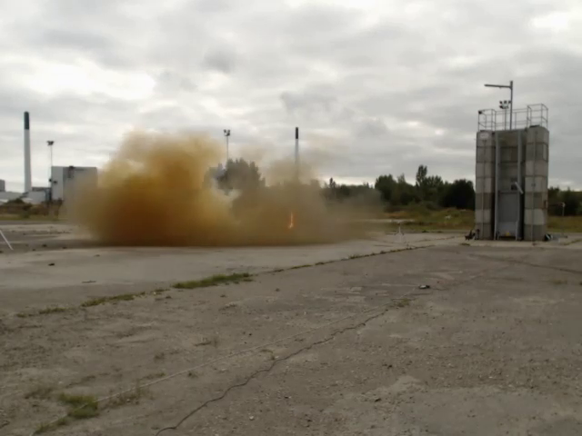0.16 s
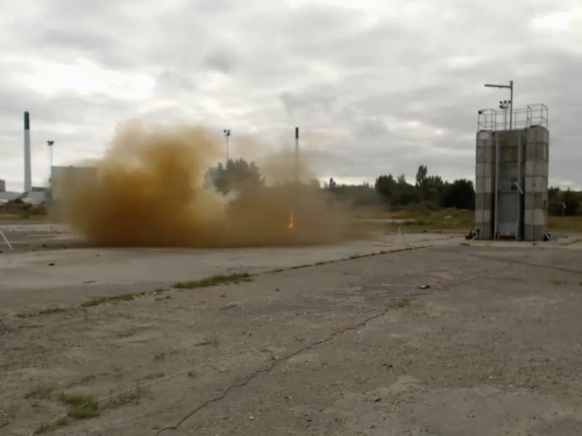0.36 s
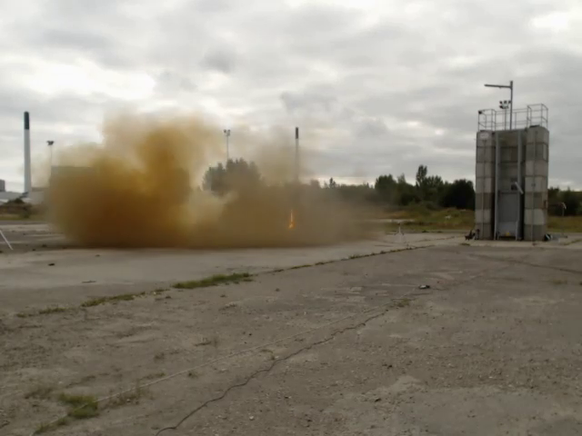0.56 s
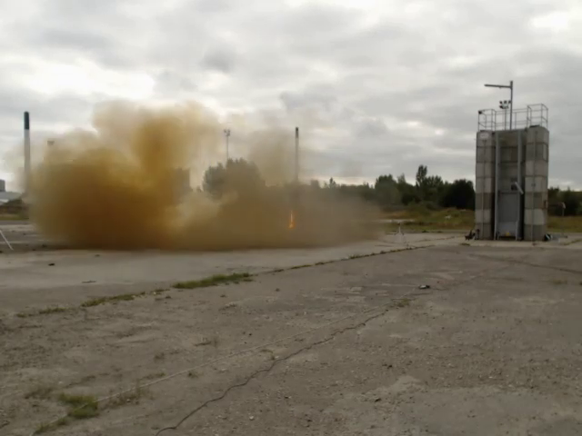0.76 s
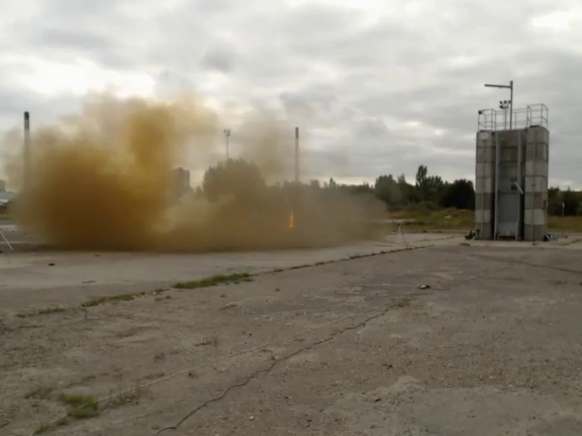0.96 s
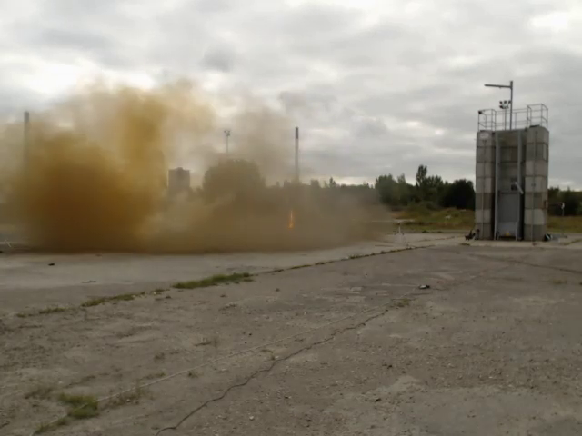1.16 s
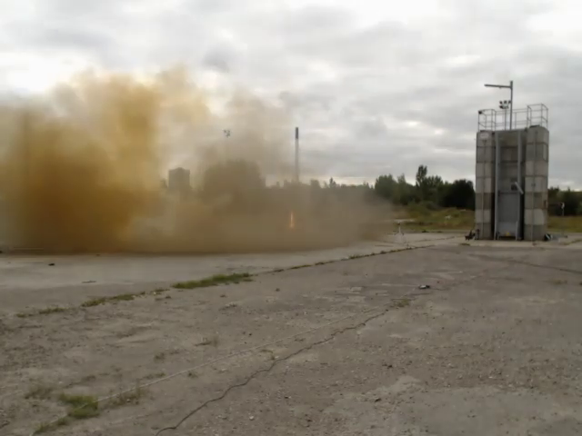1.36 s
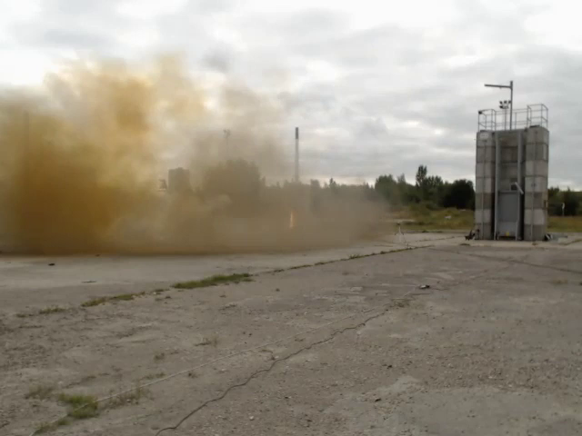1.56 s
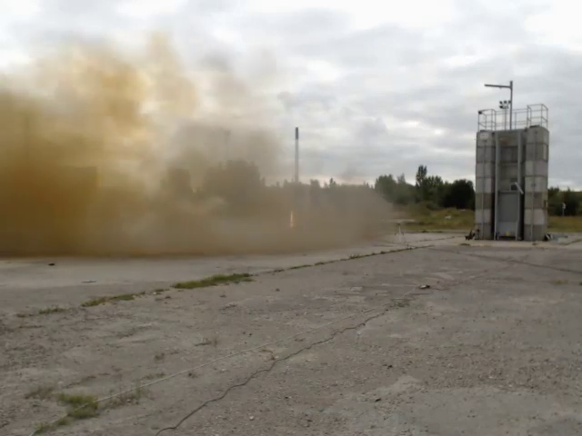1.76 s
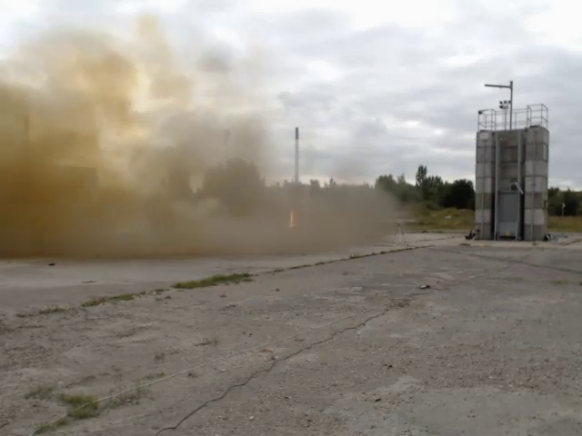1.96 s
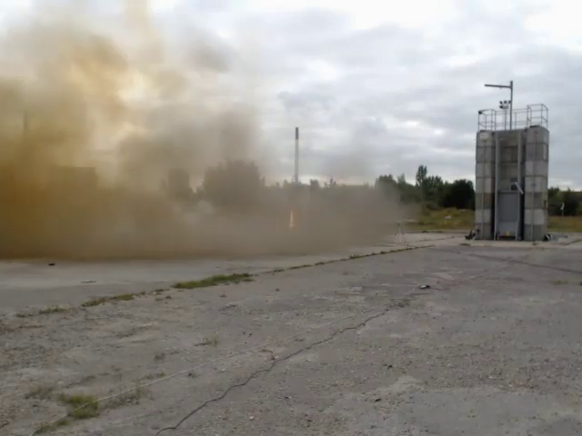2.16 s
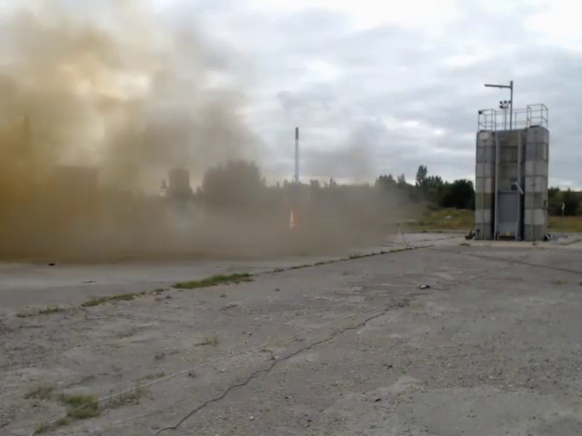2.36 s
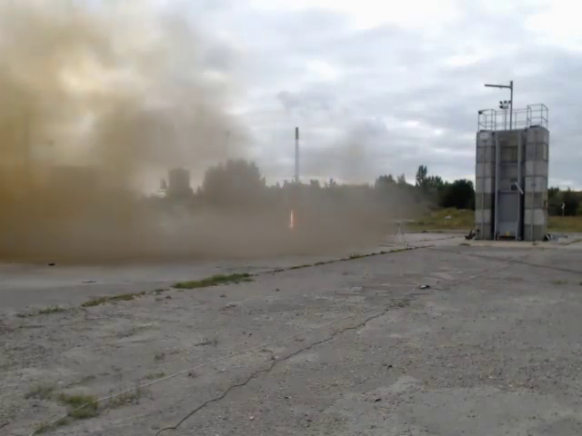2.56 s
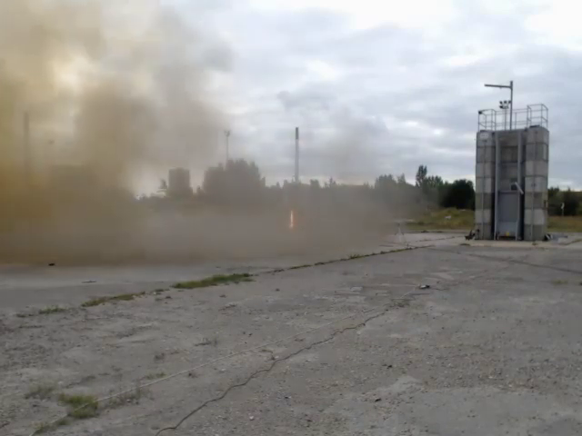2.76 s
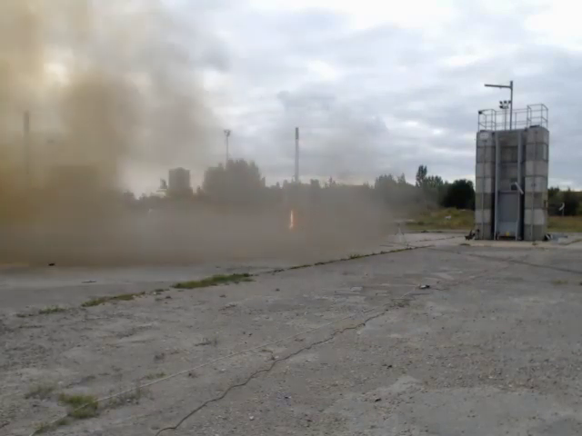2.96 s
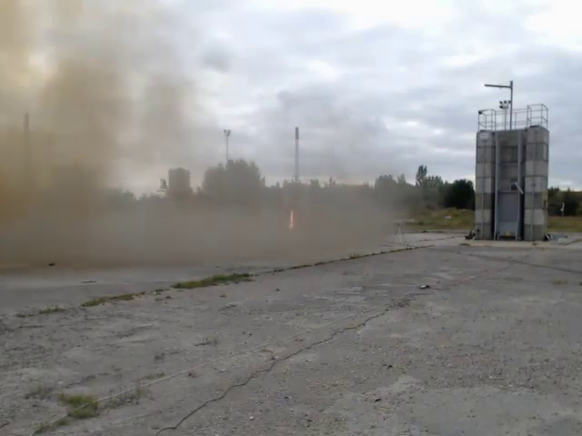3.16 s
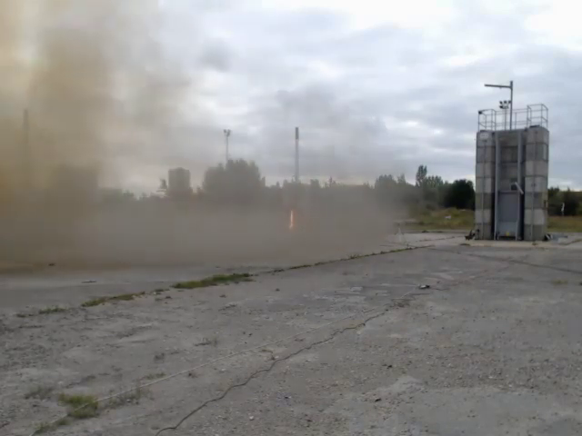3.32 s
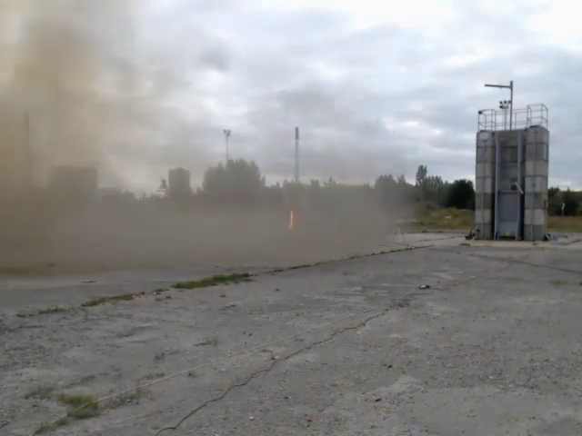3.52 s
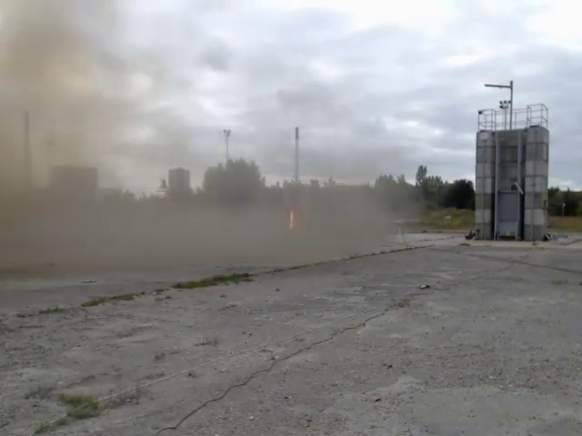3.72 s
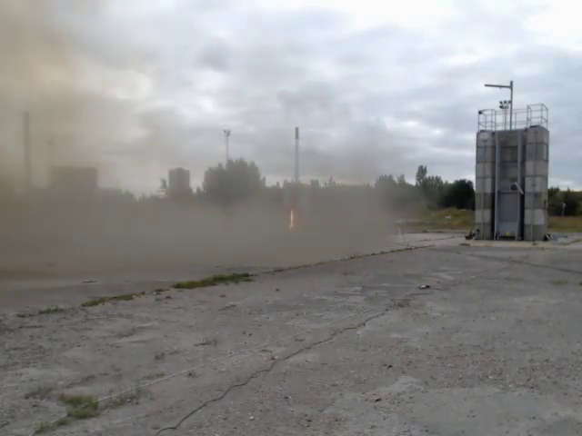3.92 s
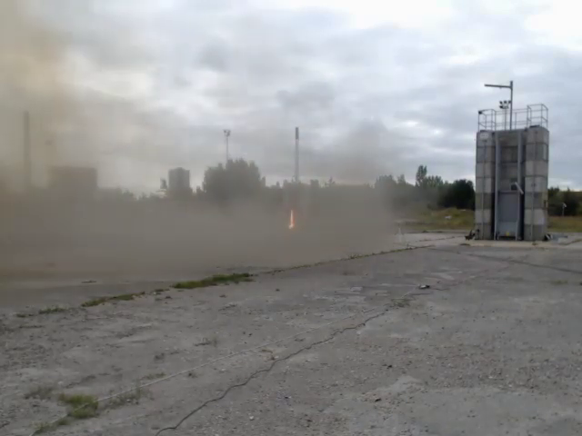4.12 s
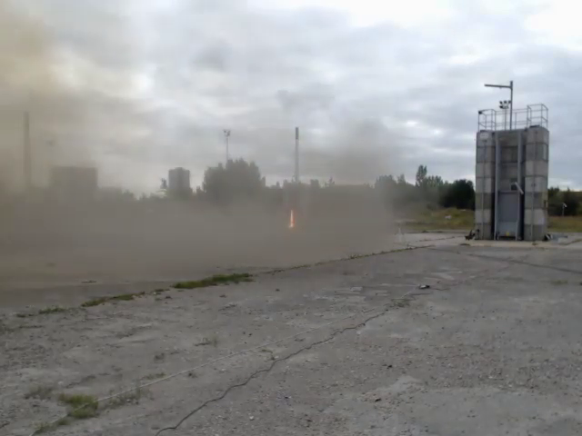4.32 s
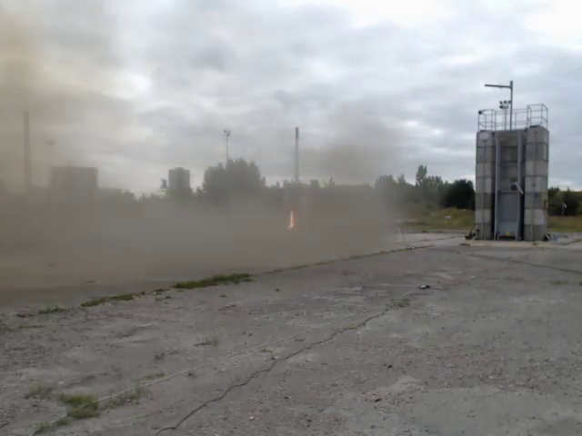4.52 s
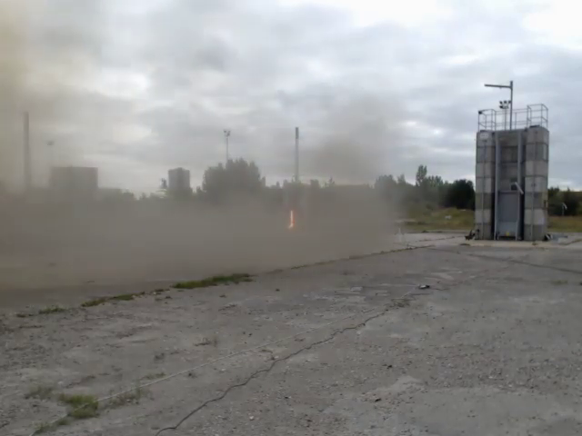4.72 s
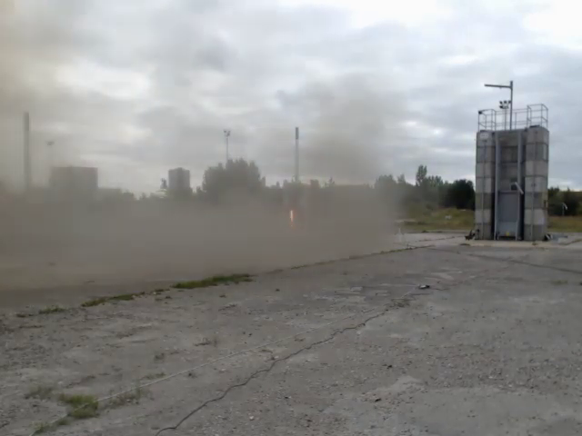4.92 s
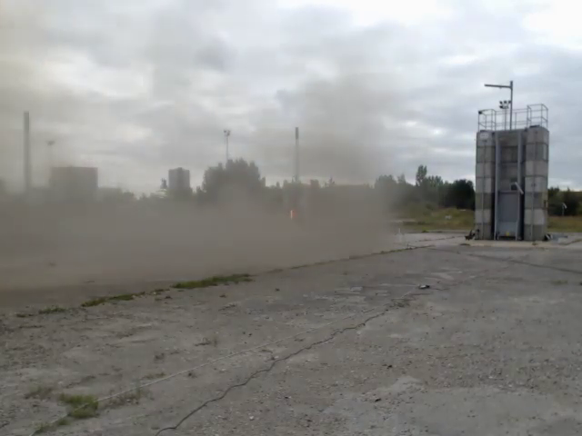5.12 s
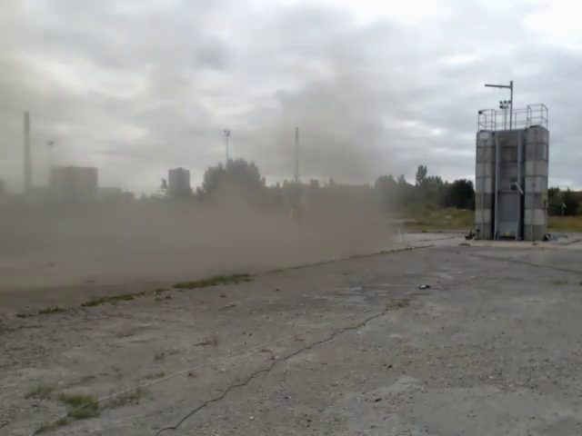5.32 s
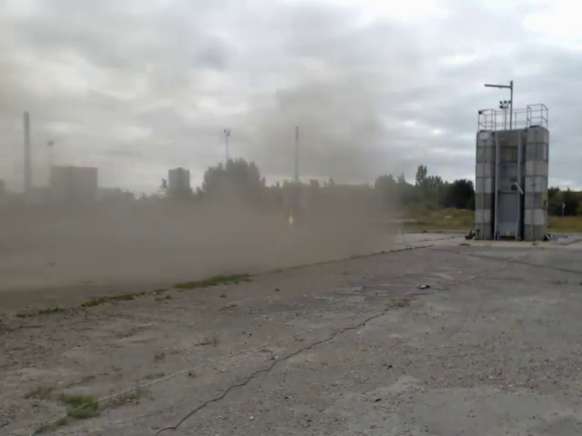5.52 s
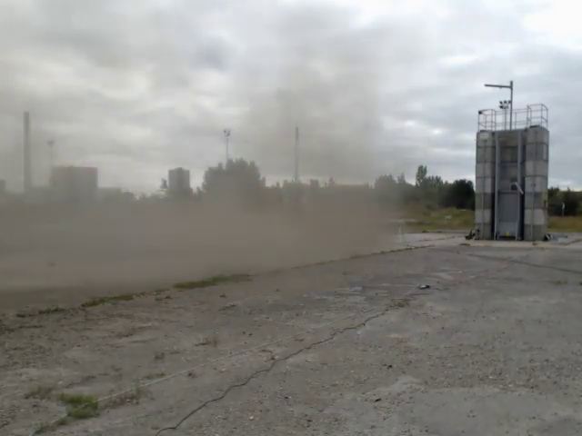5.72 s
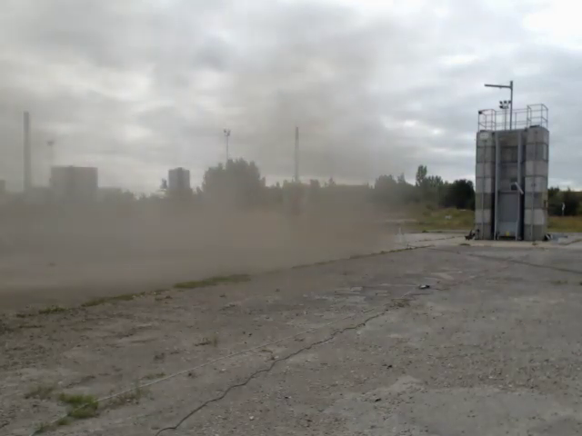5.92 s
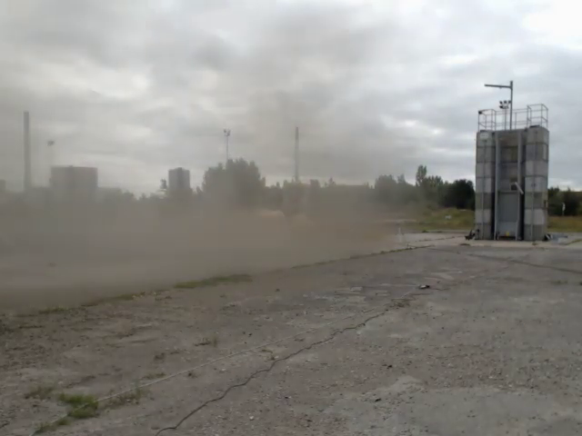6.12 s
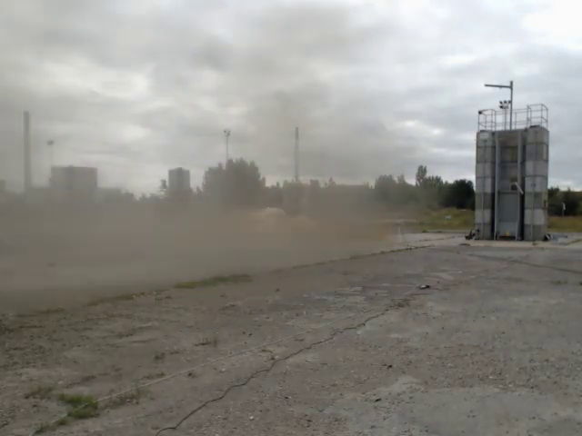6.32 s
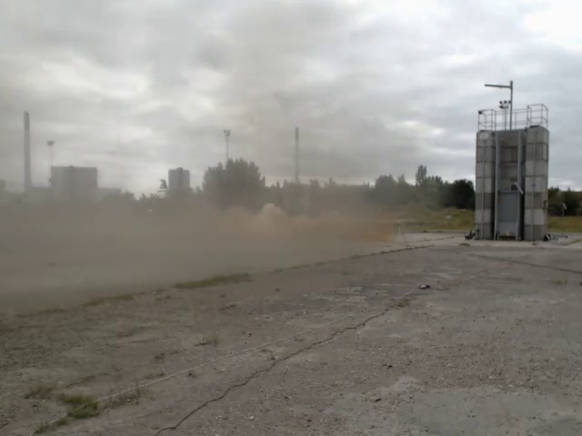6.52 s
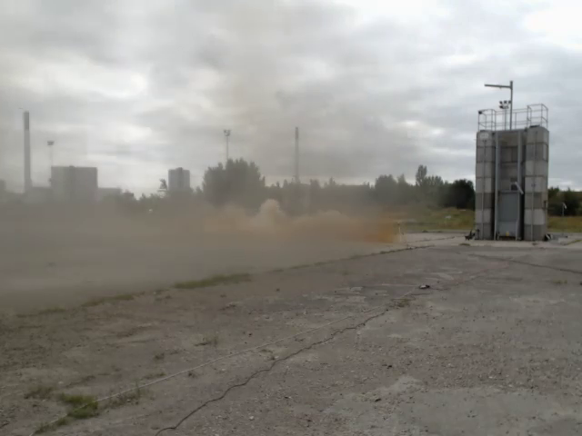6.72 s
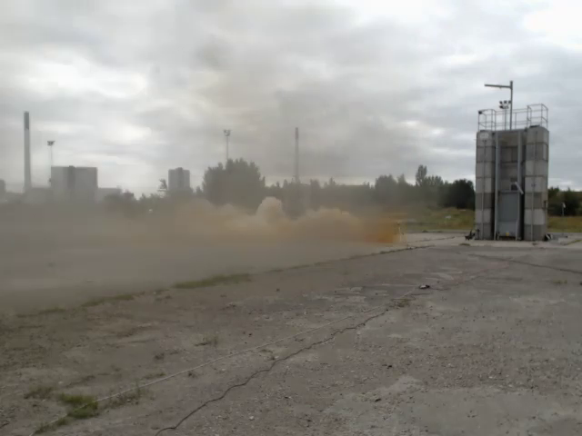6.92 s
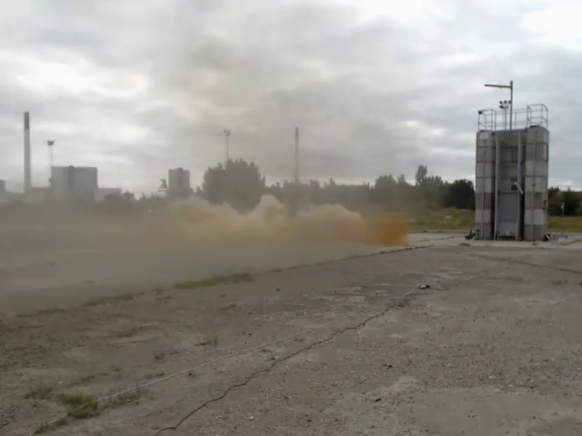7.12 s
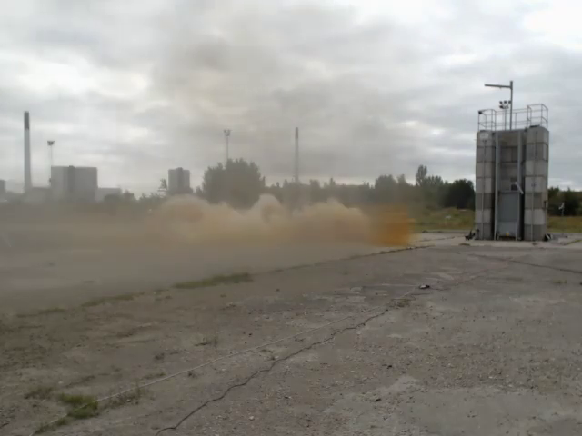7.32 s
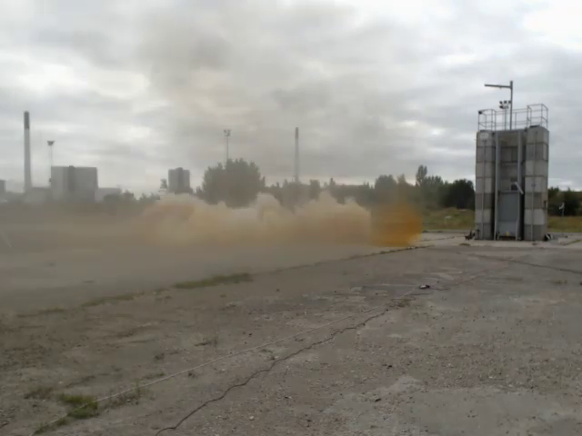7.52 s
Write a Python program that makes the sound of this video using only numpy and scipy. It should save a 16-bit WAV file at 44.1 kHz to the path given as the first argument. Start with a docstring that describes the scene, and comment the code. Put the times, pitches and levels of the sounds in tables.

```python
"""A rocket engine burns on an outdoor test stand: its turbulent jet roars over a surging rumble.
Bands of noise that swell and sink separately make the roar; slow bell-shaped lifts make the rumble surge.
Eddies in the plume howl as narrow, gliding, gusty bands of noise. The sound overloads a mono microphone,
whose gain is faded down slowly; towards the end the thrust sags and the sound turns duller."""
import sys
import numpy as np
from scipy import signal
from scipy.fft import rfft, irfft, next_fast_len
from scipy.io import wavfile
from scipy.ndimage import uniform_filter1d

SR = 44100
rng = np.random.default_rng(int(sys.argv[2]) if len(sys.argv) > 2 else 0)


def digitize_waveform(pressure):
    """Quantize a signal to 16-bit integers and store it at the path in sys.argv[1].

    Rows of a 2-D input are taken as channels; values are limited to [-1, 1].
    """
    field = np.atleast_2d(pressure).T
    bounded = np.clip(field, -1, 1)
    quanta = np.round(bounded * 32767).astype(np.int16)
    wavfile.write(sys.argv[1], SR, quanta)


N = 338247
TIME = np.arange(N) / SR  # seconds
TICKS = np.linspace(0, N / SR, 3000)  # slow control grid, seconds

# Basic spectrum of the jet noise, relative: frequency_hz, density_db (per Hz)
JET_SPECTRUM = [(40, 4), (100, -7.5), (160, -3.5), (290, -4), (550, -8.5), (950, -6.5), (1550, -7),
                (2200, -3.5), (3000, 1), (3800, 0.5), (5000, -3), (7500, -9), (10000, -17), (15000, -33)]
# Bands that reflections from the ground and the stand lift or hollow:
# centre_hz, width_hz (full width at half the lift), lift_db
REFLECTION_BANDS = [(207, 77, 3), (390, 180, 3.5), (530, 130, -1), (710, 97, 1), (960, 240, 2.5),
                    (1368, 80, 5), (1783, 270, 3), (2060, 160, 0.5), (2715, 160, 2), (3160, 160, 1),
                    (3740, 120, 3.5)]
# Centres of rumble, body and roar, then the lower edge of the shriek: frequency_hz
ZONE_HZ = [190, 470, 950, 2200]
# Slow drift of the lower zones against the shriek: time_s, rumble_db, body_db, roar_db
ZONE_DRIFT = [(0, -5, 6, 1), (.35, -8.5, 5, 5), (.95, -2.5, -6, 0), (1.5, -8, -2.5, -2.5),
              (1.95, 0.5, -6.5, 1.5), (2.45, 2, 3, 3), (3.2, 1, -1.5, 3), (3.65, -3, 5.5, -0.5),
              (4.0, -1.5, 3, 3.5), (4.75, -1, -3, 2.5), (5.15, 0.5, 2, 0), (6.1, -3, -1, 1),
              (6.65, 0.5, 3, 6.5), (7.67, 4, 11, 7)]
# Thrust of the engine: time_s, pressure_db (drive ahead of the microphone), hiss_db (lift of the top bands)
THRUST_COURSE = [(0, 32, 2), (.7, 7, 4.5), (1.3, -0.5, 0), (1.9, -8, -1.5), (2.4, -7.5, 1), (2.8, -5.5, 2),
                 (4.5, -1, 1), (5.5, -1.5, 1.5), (6.1, -1, -1), (6.5, -6.5, 4.5), (7.25, -15, 1),
                 (7.67, -15, -2)]
# Strength of the swirling at the eddy size that swirls most: time_s, spread_db
SWIRL_COURSE = [(0, 1), (1.2, 2.4), (1.7, 4), (2.5, 4), (3.3, 2), (5, 0.5), (7.67, 2.5)]
# Surges of the rumble as the plume billows: middle_s, lift_db
BILLOWS = [(.82, 5), (1.45, 8), (1.75, 6), (2.8, 5.5), (3.17, 5), (4.35, 5), (4.88, 3.5), (5.78, 9),
           (6.6, 7), (6.95, 5.5)]
BILLOW_S = 0.098  # from the peak of a surge to 1/e of its lift, either side
# Loudest howling eddies: middle_s, length_s, start_hz and end_hz (half a length before and after the middle),
# width_hz, level_db (relative to the jet, ahead of HOWL_TRIM_DB)
LOUD_EDDIES = [ (.42, 0.46, 960, 1001, 480, -6.5), (0.462, .16, 4730, 4580, 900, -4),
               (0.641, 0.14, 3753, 3003, 700, -5), (0.668, .15, 1000, 1000, 170, -9.5),
               (.888, .17, 1780, 1830, 420, -4.5), (1.098, .16, 3690, 3650, 900, -1.5),
               (1.307, .12, 2980, 2850, 700, -4.5), (1.405, 0.051, 6410, 6400, 800, -5.5),
               (1.508, .07, 1262, 1390, 350, -8), (1.565, 0.069, 3175, 2800, 500, -1),
               (1.68, 0.095, 4316, 3850, 900, -1), (1.801, 0.17, 1354, 1394, 280, -6.5),
               (1.80, .11, 2236, 2107, 500, -7.5), (1.863, 0.054, 4100, 3520, 500, -3),
               (1.96, .11, 2788, 2396, 350, -2.5), (2.001, .12, 1457, 1753, 320, -5.5),
               (2.044, .09, 3600, 3750, 800, -1.5), (2.12, .11, 1875, 1917, 450, -9),
               (2.229, .09, 3930, 4130, 550, -3.5), (2.327, 0.088, 1201, 906, 180, -2.5),
               (2.461, .063, 1964, 1820, 300, -4), (2.468, 0.092, 2620, 2770, 400, 0.5),
               (2.498, .12, 320, 358, 110, -10), (2.549, .10, 1500, 1428, 380, -1.5),
               (2.649, .13, 3030, 2693, 600, -1.5), (3.121, 0.058, 1410, 1290, 220, -9),
               (3.413, .11, 2870, 3350, 650, 1), (3.699, .25, 3150, 2990, 600, -4),
               (3.863, 0.051, 2940, 3140, 380, -3.5), (5.25, 0.47, 3650, 3606, 1000, -5.5),
               (5.909, .26, 832, 1157, 340, -9.5), (6.203, 0.23, 2240, 2000, 550, -8.5),
               (6.356, 0.12, 5760, 6150, 1300, -7.5), (6.545, 0.17, 7300, 6870, 1700, -8),
               (6.95, .45, 330, 370, 110, -13), (7.051, 0.61, 2094, 2120, 260, -10.5),
               (7.202, .22, 1013, 1014, 170, -8.5), (7.51, .13, 2650, 3150, 450, -2.5)]
# Fainter random eddies: pitch range, mean length, largest glide either way, level ahead of HOWL_TRIM_DB
EDDY_LOW_HZ, EDDY_HIGH_HZ, EDDY_S, EDDY_GLIDE_OCTAVES, EDDY_DB = 1300, 5190, .09, 0.1164, -10.5
EDDY_WIDTH_SHARE = 0.19  # bandwidth as a share of the starting pitch
HOWL_TRIM_DB = -1.15  # common to all eddies
# The recorder's volume as it is turned down: time_s, gain_db
VOLUME_FADE = [(0, -7.4), (1.2, -8.5), (2.05, -11), (2.85, -15.5), (3.5, -17), (4.6, -21.7), (5.6, -23.5),
               (6.6, -25), (7.2, -27), (7.67, -32)]
TOP_HZ = 15700  # upper edge of the pass band


def undb(db):
    """Amplitude ratio is ten to the power of the level in decibels over twenty."""
    return 10 ** (np.asarray(db) / 20)


def unit(x):
    """Division by the root mean square gives unit effective amplitude."""
    return x / np.sqrt(np.mean(x ** 2))


def curves(table):
    """Linear interpolation carries each column of a timed table onto the control grid."""
    times, *columns = np.transpose(table)
    return [np.interp(TICKS, times, column) for column in columns]


def smooth(control):
    """Linear interpolation fills a slow control in for every sample."""
    return np.interp(TIME, TICKS, control)


def walk(rate, count=1024):
    """Random values joined `rate` times a second form a slow fluctuation with a spread near 1."""
    place = TICKS * rate + rng.random()
    # the root restores the spread that interpolation takes away
    return np.sqrt(1.5) * np.interp(place, np.arange(count), rng.standard_normal(count))


def butter(x, hz, kind, order):
    """A Butterworth filter has a maximally flat pass band."""
    return signal.sosfilt(signal.butter(order, hz, kind, fs=SR, output="sos"), x)


def reinforcement(f):
    """Interference with reflections lifts or hollows fixed bands, each shaped as a resonance curve in dB."""
    return undb(sum(db / (1 + (2 * (f - centre) / width) ** 2) for centre, width, db in REFLECTION_BANDS))


def surges():
    """Billowing of the plume lifts the rumble level (dB) in bell-shaped swells."""
    return sum(db * np.exp(-((TICKS - middle) / BILLOW_S) ** 2) for middle, db in BILLOWS)


def jet(zone_dbs, hiss_db, swirl_rate=34, buffet_db=1.13, shriek_hz=3800, hiss_hz=6500,
        swirl_hz=2300, swirl_octaves=2.14):
    """Turbulent mixing noise: eddies of each size swell and sink alone, and the large ones buffet together."""
    size = next_fast_len(N)
    f = np.maximum(np.fft.rfftfreq(size, 1 / SR), 1)
    jet_hz, jet_db = np.transpose(JET_SPECTRUM)
    spectrum_gain = undb(np.interp(np.log(f), np.log(jet_hz), jet_db))
    noise = rfft(rng.standard_normal(size)) * spectrum_gain * reinforcement(f)
    swirl_db, = curves(SWIRL_COURSE)
    buffet = buffet_db * walk(9)
    centres = np.geomspace(500, 9500, 36) - 400  # 100 to 9100 Hz
    out = 0
    for hz, pick in zip(centres, np.eye(len(centres))):
        # overlapping triangular bands add up to the whole spectrum
        band = irfft(noise * np.interp(f, centres, pick), size)[:N]
        shares = [np.interp(np.log(hz), np.log(ZONE_HZ), zone) for zone in np.eye(len(ZONE_HZ))]
        # the shriek, the last zone, has no drift or buffet
        level_db = sum(share * (zone_db + buffet) for share, zone_db in zip(shares, zone_dbs))
        hiss_share = np.clip((hz - shriek_hz) / (hiss_hz - shriek_hz), 0, 1)
        level_db = level_db + hiss_db * hiss_share
        # middle sizes swirl most; deep rumble and fine hiss stay more even
        swirl = swirl_db * np.exp(-(np.log2(hz / swirl_hz) / swirl_octaves) ** 2)
        out = out + band * smooth(undb(level_db + swirl * walk(swirl_rate)))
    return unit(out)


def howl(middle_s, length_s, start_hz, end_hz, width_hz, db, reach=1.15, gust_db=2.5, waver=.018):
    """One eddy: a narrow noise band on a gliding carrier swells and dies, with gusts and a wavering pitch."""
    out = np.zeros(N)
    first = max(int((middle_s - reach * length_s) * SR), 0)
    last = min(int((middle_s + reach * length_s) * SR), N)
    i = np.arange(first, last)
    f = np.fft.fftfreq(SR, 1 / SR)
    white = rng.standard_normal(SR) + 1j * rng.standard_normal(SR)
    flutter = np.fft.ifft(white * np.exp(-2 * (f / width_hz) ** 2))
    gusts = undb(gust_db * np.interp(TIME[i], TICKS, walk(65)))
    age = (TIME[i] - middle_s) / length_s
    glide_hz = start_hz * (end_hz / start_hz) ** (age + .5)
    hz = glide_hz * (1 + waver * np.interp(TIME[i], TICKS, walk(45)))
    carrier = np.exp(2j * np.pi * np.cumsum(hz) / SR)
    band = (flutter[i % SR] * carrier).real / flutter.real.std()
    swell = np.cos(np.pi / 2 * age / reach) ** 2
    out[i] = undb(db) * swell * gusts * band
    return out


def howls(count=30):
    """Superposition of the loud eddies and fainter ones of random pitch, scattered through the burn."""
    faint = []
    for k, (when, pitch, length, glide) in enumerate(rng.random((count, 4))):
        middle_s = (k + when) / count * N / SR
        length_s = EDDY_S * (.5 + length)
        start_hz = EDDY_LOW_HZ * (EDDY_HIGH_HZ / EDDY_LOW_HZ) ** pitch
        end_hz = start_hz * 2 ** (EDDY_GLIDE_OCTAVES * (2 * glide - 1))
        faint.append((middle_s, length_s, start_hz, end_hz, EDDY_WIDTH_SHARE * start_hz, EDDY_DB))
    return sum(howl(*eddy) for eddy in faint + LOUD_EDDIES)


def scene():
    """Superposition of jet and howls, driven together by the pressure of the thrust."""
    rumble_db, body_db, roar_db = curves(ZONE_DRIFT)
    pressure_db, hiss_db = curves(THRUST_COURSE)
    jet_noise = jet([rumble_db + surges(), body_db, roar_db], hiss_db)
    plume = jet_noise + undb(HOWL_TRIM_DB) * howls()
    roar = smooth(undb(pressure_db)) * plume
    return np.array([roar, roar])


def saturate(x):
    """Smooth overload flattens peaks and adds overtones; the doubled rate reduces aliasing."""
    return signal.resample_poly(np.tanh(signal.resample_poly(x, 2, 1)), 1, 2)


def record(dry, drive_db=1.5, wind_cut_hz=128, soft_hz=12000, ceiling=.49):
    """The microphone overloads, a wind filter thins the bass, and the faded amplifier rounds peaks again."""
    mic = saturate(undb(drive_db) * dry.mean(axis=0))
    mic = butter(mic, wind_cut_hz, "high", order=4)
    mic = butter(mic, soft_hz, "low", order=1)
    # the input stage, an all-pass, shifts the lows against the highs and tilts the flattened wave tops
    pole = np.exp(-2 * np.pi * 130 / SR)  # 130 Hz
    mic = signal.lfilter([pole, -1], [1, -pole], mic)
    # a slow gain control holds the half-second level steady ahead of the fader
    mic = mic / np.sqrt(uniform_filter1d(mic ** 2, SR // 2))
    fader = smooth(undb(curves(VOLUME_FADE)[0]))
    out = ceiling * saturate(fader * mic / ceiling)
    # steep low-pass: 0.1 dB ripple, 90 dB rejection
    out = signal.sosfilt(signal.ellip(10, .1, 90, TOP_HZ, fs=SR, output="sos"), out)
    return np.array([out, out])


dry = scene()
out = record(dry)
digitize_waveform(out)
```